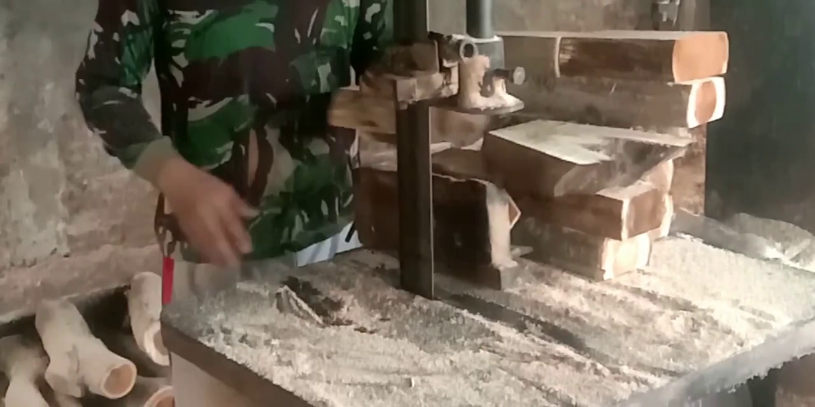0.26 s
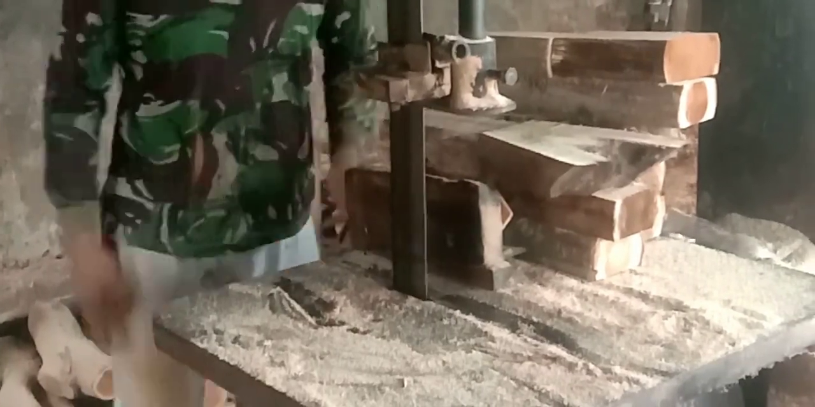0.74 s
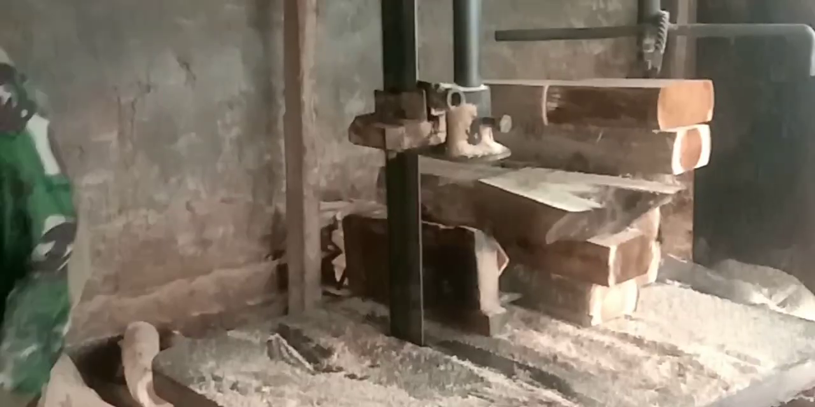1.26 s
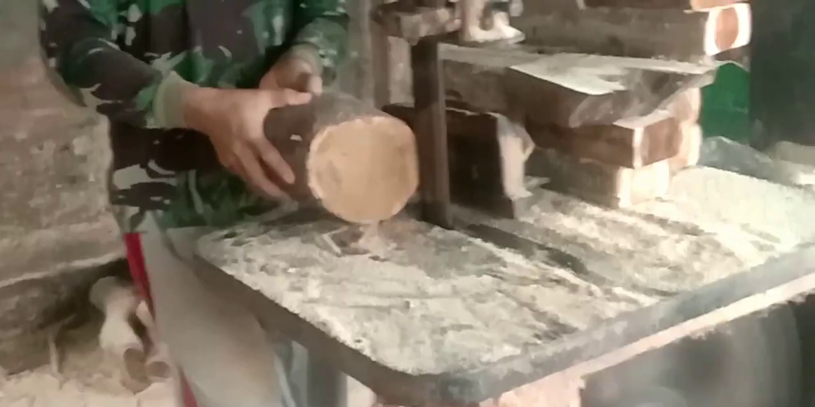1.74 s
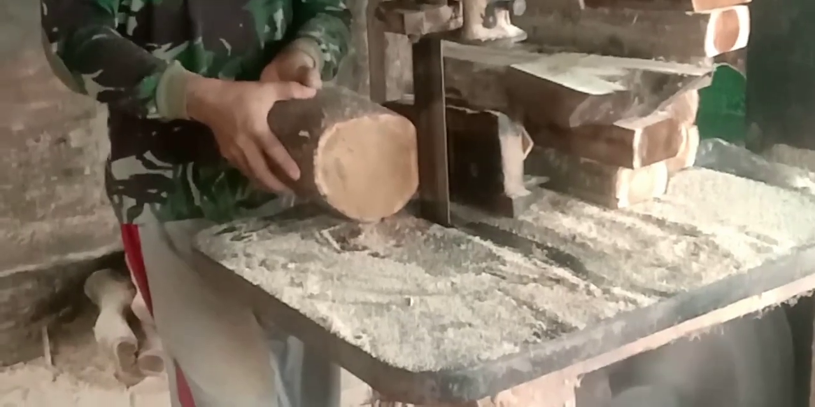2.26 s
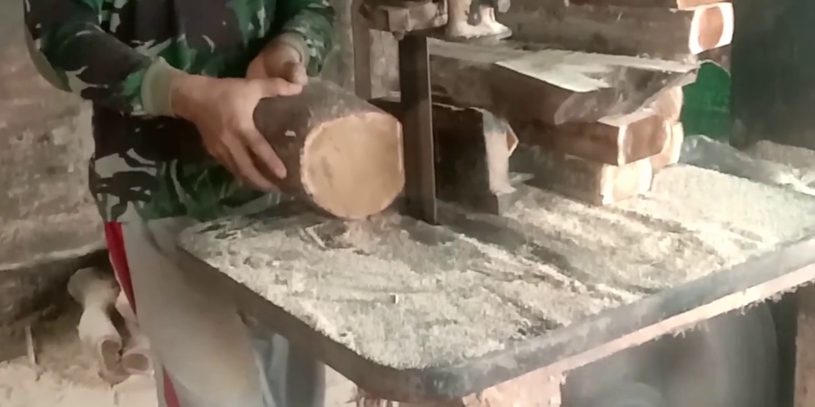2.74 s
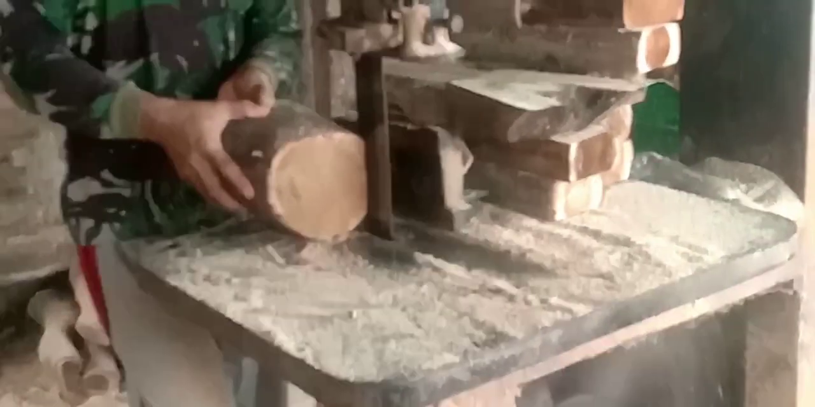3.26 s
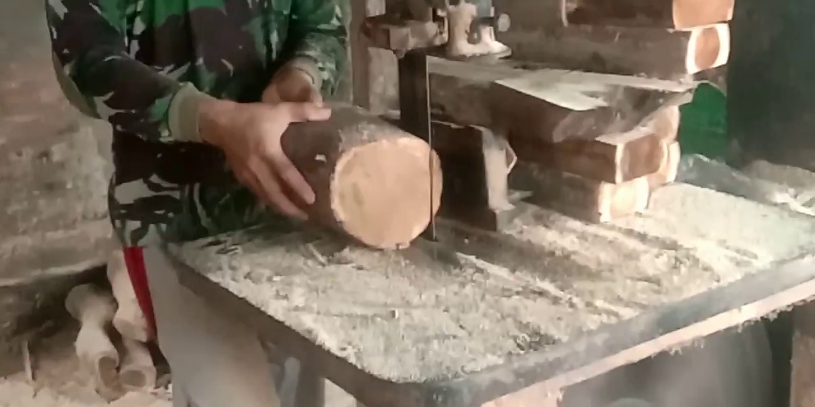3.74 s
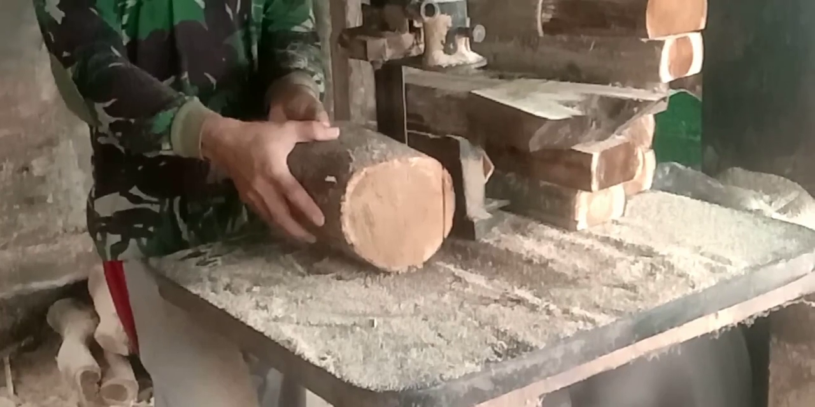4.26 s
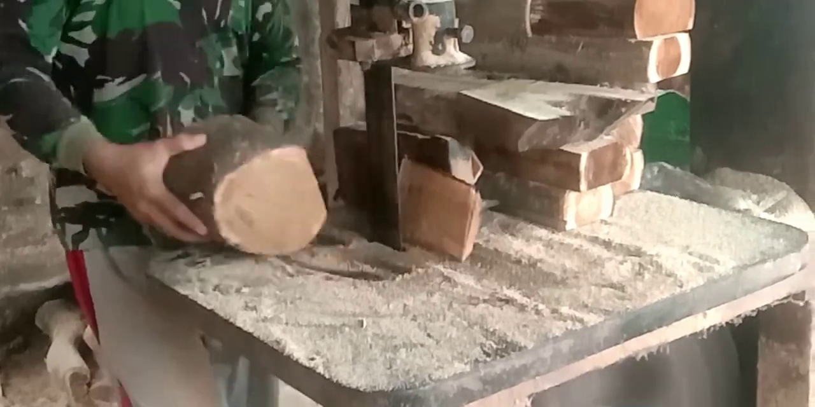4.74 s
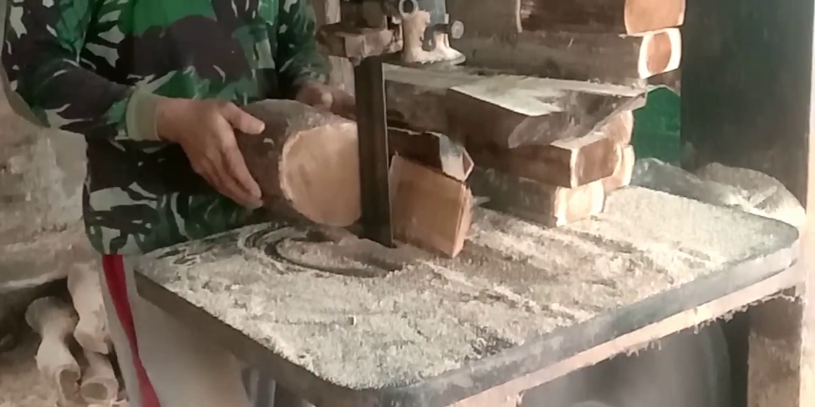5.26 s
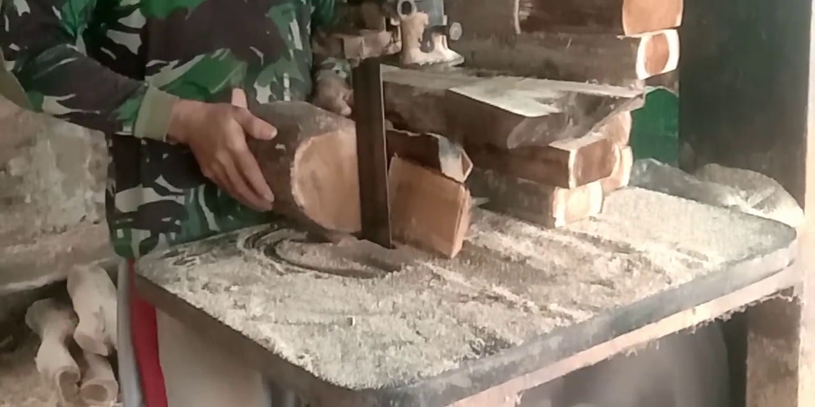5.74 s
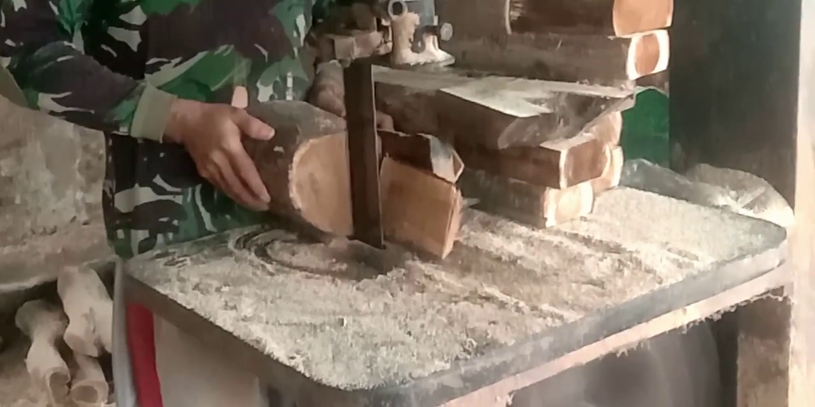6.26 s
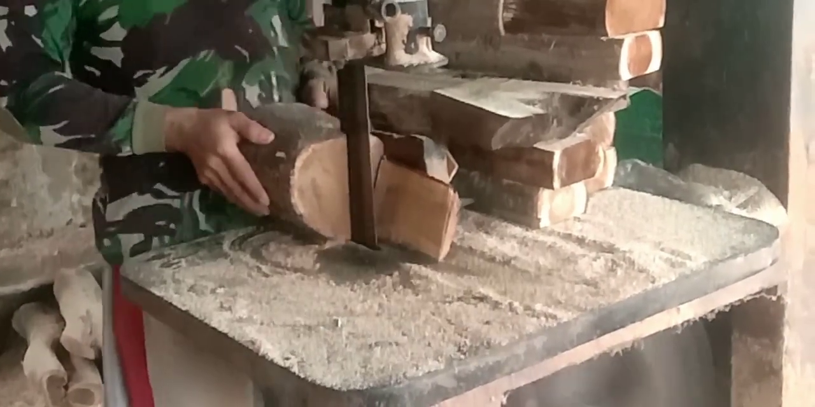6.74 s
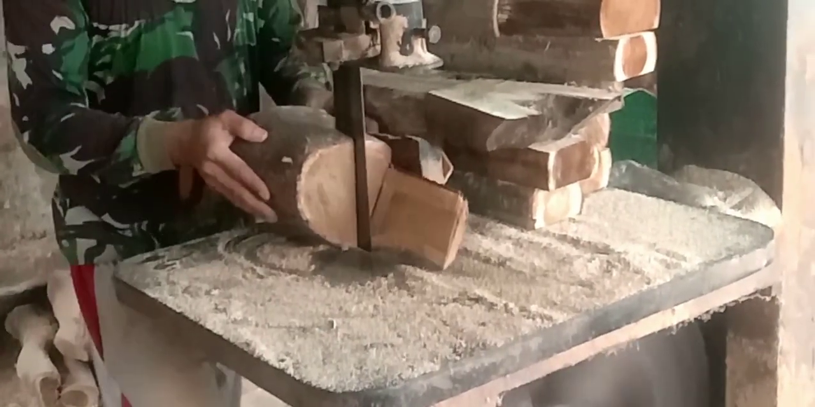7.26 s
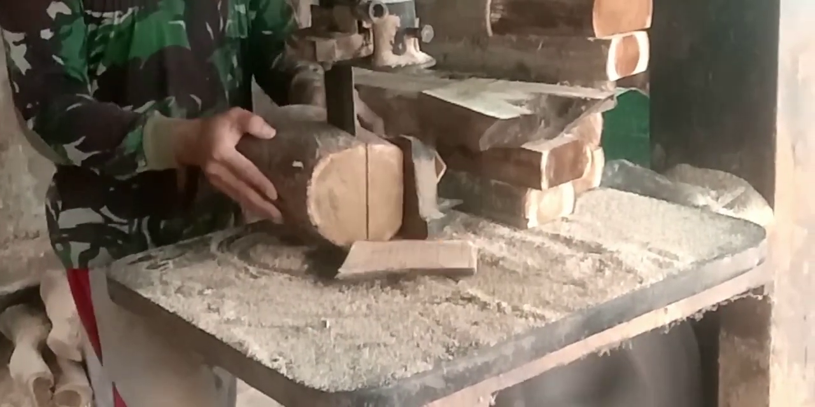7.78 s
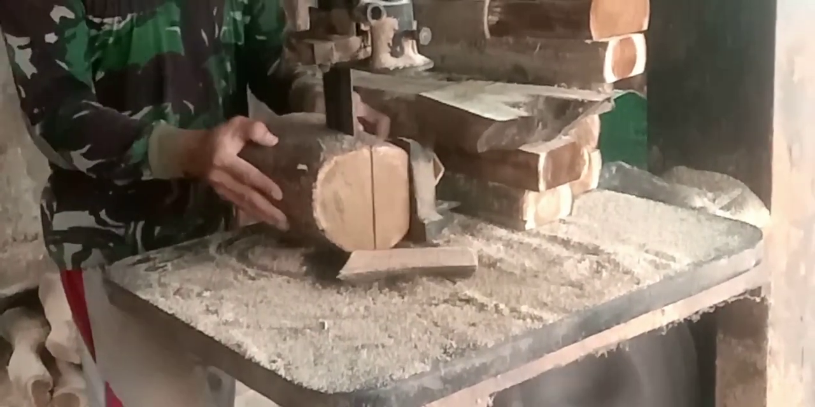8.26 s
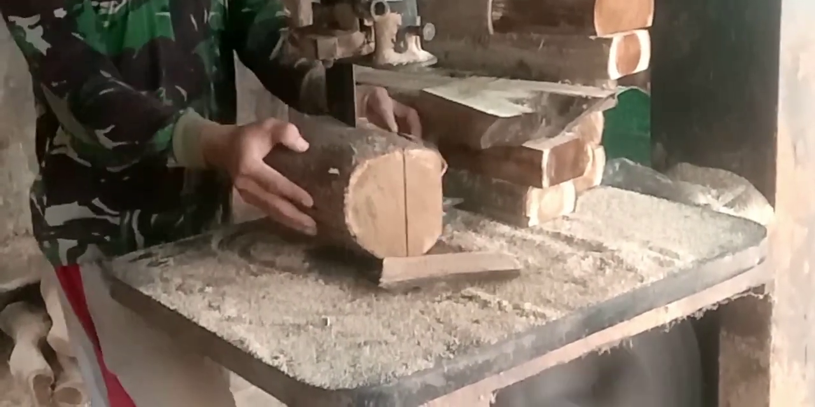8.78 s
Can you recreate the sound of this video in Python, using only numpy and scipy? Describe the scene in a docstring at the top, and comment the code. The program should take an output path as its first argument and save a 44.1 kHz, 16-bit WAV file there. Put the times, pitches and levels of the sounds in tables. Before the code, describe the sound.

In a workshop, a band saw blade rattles and rings in its guides while the drive thumps rapidly and hums beneath. After one very brief dropout, a log meets the teeth: a high hiss rises, narrow squeals come and go, and the ringing turns rougher. More cuts follow, and a loose offcut topples with four quick knocks as the saw keeps running. Everything is heard in mono.

```python
"""A dense, ringing rattle over a low throb: a band saw runs in a workshop, fed short logs by hand.
The blade rubs through its guides and rings four resonances of wheels and guard; the drive thumps
and hums below. Narrow blade modes sing for a while, and the teeth hiss in the top treble when
they bite. Late on an offcut tips over and rocks. Mono; the sound drops out once, briefly."""
import sys
import numpy as np
from scipy import signal
from scipy.fft import rfft, irfft, next_fast_len
from scipy.io import wavfile

SR = 44100
rng = np.random.default_rng(int(sys.argv[2]) if len(sys.argv) > 2 else 0)


def inscribe(sig):
    """Save sig as 16-bit PCM at rate SR to the path in sys.argv[1].

    A 1-D sig is mono; a 2-D sig holds one channel per row.
    Samples are clipped to [-1, 1] before scaling.
    """
    pcm = np.round(np.clip(np.atleast_2d(sig).T, -1, 1) * 32767)
    wavfile.write(sys.argv[1], SR, pcm.astype(np.int16))


N = 397341

# Blade in its guides, two consecutive spans. Each row: time in seconds, rubbing level in dB,
# then base levels of the lowest, third and top ring in dB.
BLADE_LEVELS = [
    [(0, -26, -23.5, -28, -28.5), (.3, -25, -25, -27.5, -26), (.76, -25.5, -23.5, -30, -28),
     (.9, -28.5, -26.5, -26.5, -27), (1.3, -25.5, -26, -29, -30), (1.5, -25.5, -26.5, -29, -32),
     (1.62, -25, -23, -34, -31.5), (1.665, -28, -27.5, -30, -30.5)],
    [(1.69, -29.5, -30, -28, -30.5), (2.36, -27.5, -29, -27, -32), (3.13, -30.5, -30, -28, -29.5),
     (3.19, -30.5, -35, -28.5, -25), (3.23, -31.5, -36, -34, -28), (3.3, -30, -30.5, -29, -33),
     (4.4, -30.5, -29.5, -32, -40), (4.6, -28, -28.5, -32, -35), (5.07, -28.5, -28.5, -28, -30.5),
     (6.13, -28, -28.5, -28, -33), (6.6, -33, -31.5, -29, -29.5), (6.82, -32, -31, -32.5, -33),
     (6.97, -31, -28, -25.5, -28), (7.15, -32, -31, -35, -37), (7.32, -33, -33, -36, -30),
     (7.38, -32, -31, -28, -38), (7.46, -32, -34, -32, -30.5), (7.58, -32.5, -30.5, -35.5, -36),
     (8.03, -29, -27, -31.5, -35), (8.46, -31.5, -31.5, -35, -39.5), (8.93, -29.5, -30, -35, -36.5),
     (9.01, -27.5, -22, -30, -41)],
]
# Wood damping the sharp modes, two consecutive spans. Each row: time in seconds, damping in dB.
WOOD_DAMPING = [
    [(0, -5), (1.66, -3.5)],
    [(1.69, -4), (3.2, -1.5), (3.6, -2), (4.4, 4.5), (4.7, 0), (6.2, -2.5), (6.6, 2), (7.5, 3.5), (7.9, 3),
     (9.01, 4)],
]


def from_db(db):
    """Decibels to gain."""
    return 10 ** (np.asarray(db) / 20)


def unit_rms(x):
    """Scale to rms 1."""
    return x / np.sqrt(np.mean(x ** 2) + 1e-20)


def curves(spans):
    """Join spans of (seconds, values..) rows; interpolate each value column per sample."""
    times_s, *columns = np.transpose(np.concatenate(spans))
    return [np.interp(np.arange(N) / SR, times_s, column) for column in columns]


def coloured(x, spectrum):
    """Shape by (Hz, dB) points on a log-frequency axis; rms 1."""
    size = next_fast_len(N)
    hz = np.maximum(np.arange(size // 2 + 1) * SR / size, 1)
    points_hz, points_db = np.transpose(spectrum)
    gain = from_db(np.interp(np.log(hz), np.log(points_hz), points_db))
    return unit_rms(irfft(rfft(x, size) * gain, size)[:N])


def drift(corner_hz):
    """Slow wander: noise at every 20th sample through a double one-pole low-pass; rms 1."""
    r = np.exp(-2 * np.pi * corner_hz * 20 / SR)
    noise = rng.standard_normal(N // 20 + 2002)
    slow = signal.lfilter([1], [1, -2 * r, r * r], noise)[2000:]
    return np.interp(np.arange(N) / 20, np.arange(len(slow)), unit_rms(slow))


def resonance(x, hz, width_hz):
    """Two-pole band-pass; rms 1."""
    r = np.exp(-np.pi * width_hz / SR)
    w = 2 * np.pi * hz / SR
    return unit_rms(signal.lfilter([1, 0, -1], [1, -2 * r * np.cos(w), r * r], x))


def grains(spread_db):
    """A contact at every sample, of uneven size and random sign; rms 1."""
    size_db = spread_db * np.minimum(rng.exponential(1, N), 6)
    return unit_rms(from_db(size_db) * rng.standard_normal(N))


def rubbed_db(base_db, follow, damped):
    """Level of a part that follows the swing of the rubbing and yields to damping, both in dB per dB."""
    rubbing_db = curves(BLADE_LEVELS)[0]
    damping_db, = curves(WOOD_DAMPING)
    return base_db + follow * (rubbing_db - rubbing_db.mean()) - damped * damping_db


def blade(pressure):
    """The blade rubs in its guides: a broad rattle, plus the wheels and guard that it keeps ringing."""
    # Each row: frequency in Hz, relative level in dB.
    rattle_spectrum = [(500, -18), (700, -8.5), (950, 4.5), (1300, 2.5), (1900, 0.5), (3000, 1.5),
                       (3900, -1), (4700, -4.5), (6000, 0), (7600, -1), (8400, -16), (10000, -47),
                       (16000, -40)]
    # Ringing parts. Each row: sharp mode's centre and width in Hz, broad neighbour's centre and
    # width per pass in Hz, its relative level in dB, its gain in dB per dB of damping.
    rings = [(1341.3, 45, 1253, 165, -5, 0.8), (2875, 550, 2860, 1770, 10.5, 3.2),
             (3615, 79, 3700, 530, -1, 1), (6645, 80, 6470, 930, -6, 2.8)]
    damping_db, = curves(WOOD_DAMPING)
    _, lowest_db, third_db, top_db = curves(BLADE_LEVELS)
    second_db = rubbed_db(-30.5, follow=1.28, damped=.05)
    rattle = coloured(pressure * grains(spread_db=1.5), rattle_spectrum)
    out = from_db(rubbed_db(-26, follow=.96, damped=.05)) * rattle
    skirt_db = 1.5   # whole ring over the part near its centre
    for ring, ring_db in zip(rings, (lowest_db, second_db, third_db, top_db)):
        hz, width_hz, broad_hz, broad_width_hz, broad_db, damping_slope = ring
        # Each mode is struck at its own spot; the sharp one follows the pressure less.
        sharp = resonance(pressure ** .46 * grains(spread_db=1.5), hz, width_hz)
        broad = resonance(pressure * grains(spread_db=1.5), broad_hz, broad_width_hz)
        broad = resonance(broad, broad_hz, broad_width_hz)   # a mode cluster has steep flanks
        share = from_db(broad_db + damping_slope * damping_db)
        modes = (sharp + share * broad) / np.sqrt(1 + share ** 2)
        flicker_db = .5 * drift(3.3)
        out += from_db(ring_db + skirt_db + flicker_db) * modes
    return out


def drive(pressure):
    """The frame thumps once a stroke and dies down; the housing hums with a milder throb."""
    # The drive sags as wood loads the blade; two consecutive spans.
    # Each row: time in seconds, base levels of thump and hum in dB.
    drive_levels = [
        [(0, -43, -37), (.45, -42, -37.5), (1.66, -40.5, -37)],
        [(1.69, -42, -42), (1.87, -46, -40.5), (2.36, -41.5, -39), (3.42, -49.5, -41.5), (3.58, -44.5, -39.5),
         (4.72, -45.5, -36.5), (4.76, -43, -39), (6.33, -45, -38.5), (6.5, -54, -47), (6.72, -48, -39.5),
         (7.33, -51, -44.5), (7.5, -47, -37.5), (7.6, -44, -40.5), (8.09, -44, -36.5), (8.27, -47.5, -37.5),
         (8.93, -42.5, -38), (8.97, -34, -33), (9.01, -49, -36)],
    ]
    # Each row of both spectra: frequency in Hz, relative level in dB.
    thump_spectrum = [(20, -16), (50, -8), (85, -4.5), (170, 0.5), (280, -2.5), (500, -16), (1500, -44)]
    hum_spectrum = [(100, -22), (280, -10), (390, 0.5), (440, -1.5), (500, -1), (660, -12), (900, -14),
                    (2000, -37)]
    stroke_hz, skirt_db = 17.5, 1.5
    phase = np.cumsum(stroke_hz * (1 + .01 * drift(.6))) / SR % 1
    stroke = np.exp(-phase / .26) * from_db(2 * drift(4.5))
    uneven = pressure * from_db(.83 * drift(6.2))
    thump = coloured(uneven * (1 + 2 * stroke) * rng.standard_normal(N), thump_spectrum)
    hum = coloured(uneven * (1 + .23 * stroke) * rng.standard_normal(N), hum_spectrum)
    thump_db, hum_db = curves(drive_levels)
    return from_db(skirt_db) * (from_db(thump_db) * thump + from_db(hum_db) * hum)


def squeal():
    """Narrow modes of the blade swell and fade."""
    # Each row: start and end in seconds, centre and width in Hz, level at full swell in dB.
    squeals = [(-.5, 2.6, 13150, 350, -58), (1.7, 3.3, 3180, 110, -33), (2.9, 6.4, 9300, 200, -51),
               (3.94, 4.08, 2850, 20, -30)]
    t = np.arange(N) / SR
    out = np.zeros(N)
    for start_s, end_s, hz, width_hz, level_db in squeals:
        progress = np.clip((t - start_s) / (end_s - start_s), 0, 1)
        swell = np.sin(np.pi * progress).clip(0) ** .4
        out += from_db(level_db) * swell * resonance(rng.standard_normal(N), hz, width_hz)
    return out


def teeth(pressure):
    """Chips tear off in quick clumps, a fine top hiss over the even rush of passing teeth."""
    # Pushes of wood into the teeth. Each row: start, end, attack and release in seconds, hiss in dB.
    cuts = [(1.8, 3.0, .6, .2, -39), (2.7, 3.52, .5, .2, -31.5), (3.55, 4.3, .1, .3, -34.5),
            (6.05, 6.85, .2, .3, -34.5), (6.8, 7.62, 0.28, .55, -33.5), (8.12, 8.8, .15, .2, -35.5)]
    # Each row of both spectra: frequency in Hz, relative level in dB.
    hiss_spectrum = [(11000, -34), (13400, -25), (14100, -15), (14700, -8), (15000, -1), (15600, -6),
                     (16200, -40)]
    rush_spectrum = [(5000, -21), (7800, -4), (8600, -0.5), (9300, -1), (10800, -2), (11400, -6),
                     (13800, -9), (14800, 4.5), (15600, 6.5), (16200, -40)]
    t = np.arange(N) / SR
    bite = from_db(-44)   # idle hiss
    for start_s, end_s, attack_s, release_s, level_db in cuts:
        ramps = np.minimum((t - start_s) / attack_s, 1 + (end_s - t) / release_s)
        bite = np.maximum(bite, from_db(level_db) * np.clip(ramps, 0, 1))
    clumps = from_db(1.3 * drift(150) + .8 * drift(25) + 1.6 * drift(7))
    hiss = coloured(pressure * clumps * grains(spread_db=2), hiss_spectrum)
    rush = coloured(pressure ** 1.04 * grains(spread_db=2.5), rush_spectrum)
    return bite * hiss + from_db(rubbed_db(-38, follow=.05, damped=.043)) * rush


def offcut():
    """An offcut tips and rocks on the table; each knock rings its modes with strengths of its own."""
    # Each row: time in seconds, strike level in dB.
    knocks = [(7.507, -23), (7.624, -26.5), (7.717, -29), (7.824, -27)]
    # Each row: frequency in Hz, relative level in dB, time to fall 60 dB in seconds.
    wood_modes = [(388, -2, 0.091), (484, -6.5, 0.086), (950, -14, .05)]
    times_s, strike_db = np.transpose(knocks)
    scatter_db = rng.normal(0, 1.5, (len(knocks), len(wood_modes)))
    out = np.zeros(N)
    for k, (hz, level_db, t60_s) in enumerate(wood_modes):
        clicks = np.full(N, 1e-18)   # floor avoids denormals
        clicks[(times_s * SR).astype(int)] = from_db(strike_db + level_db + scatter_db[:, k])
        r = from_db(-60 / (t60_s * SR))
        w = 2 * np.pi * hz / SR
        out += signal.lfilter([0, np.sin(w)], [1, -2 * r * np.cos(w), r * r], clicks)
    return out


def scene():
    """Blade, teeth and drive share one uneven pressure; both channels are equal."""
    pressure = from_db(.45 * drift(7.2) + .98 * drift(46))
    mono = blade(pressure) + squeal() + offcut() + teeth(pressure) + drive(pressure)
    return np.stack([mono, mono])


def record(dry):
    """Rounded peaks, one short dropout, a steep low-pass."""
    mute_from_s, mute_to_s, cutoff_hz = 1.0975, 1.1338, 15470
    t = np.arange(N) / SR
    silent = (t > mute_from_s) & (t < mute_to_s)
    rounded = .91 * np.tanh(dry / .89)
    low_pass = signal.ellip(12, .5, 60, cutoff_hz, fs=SR, output="sos")
    return signal.sosfilt(low_pass, rounded * ~silent)


dry = scene()
out = record(dry)
inscribe(out)
```